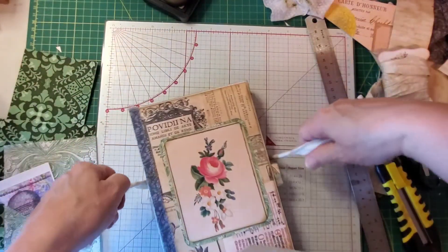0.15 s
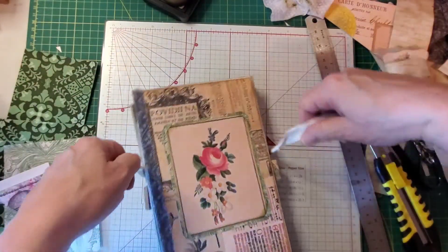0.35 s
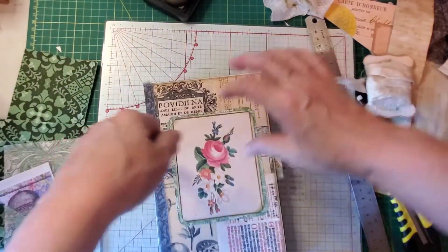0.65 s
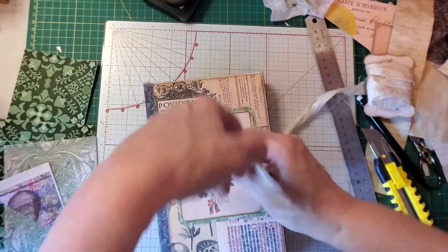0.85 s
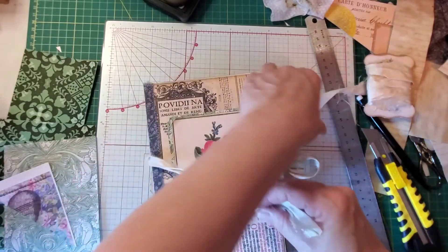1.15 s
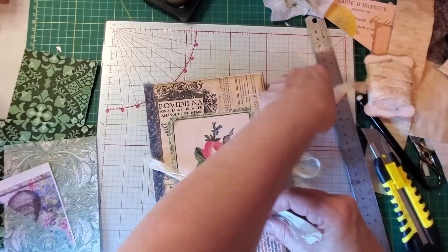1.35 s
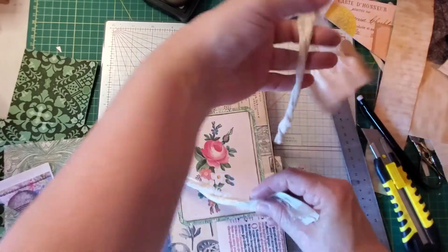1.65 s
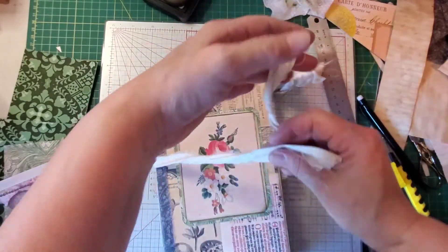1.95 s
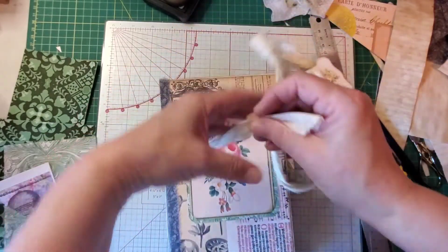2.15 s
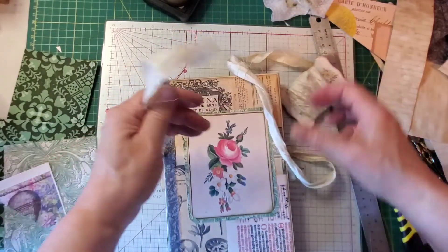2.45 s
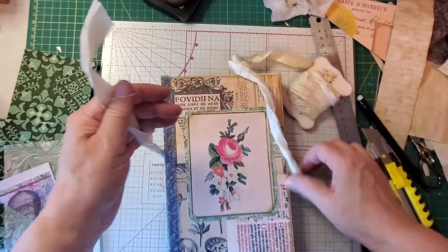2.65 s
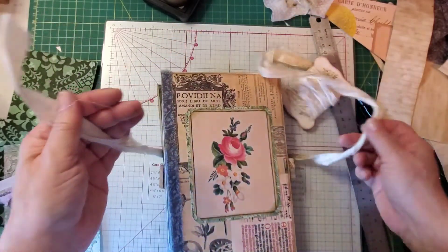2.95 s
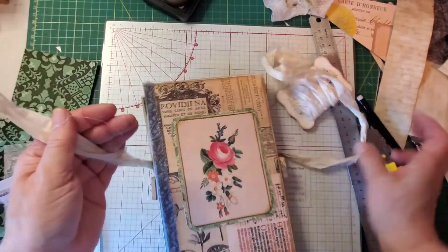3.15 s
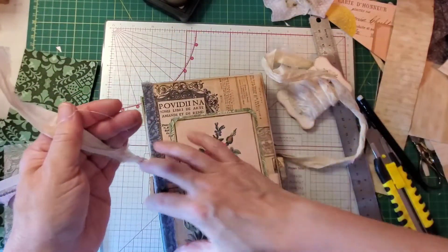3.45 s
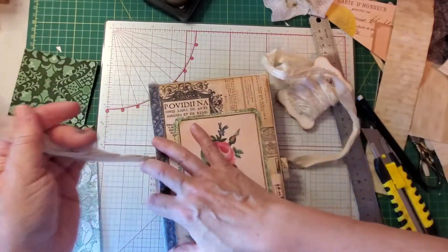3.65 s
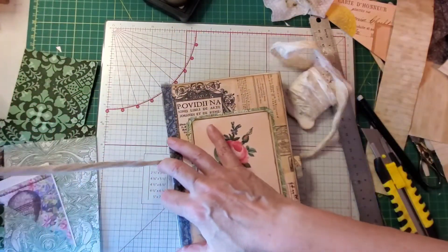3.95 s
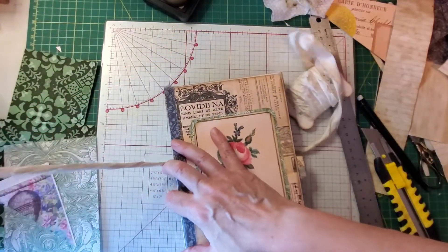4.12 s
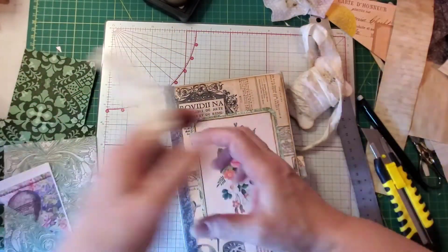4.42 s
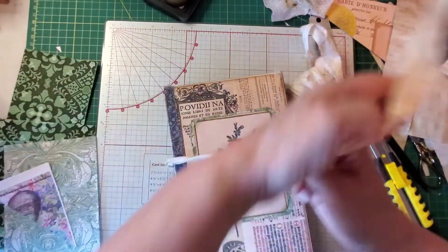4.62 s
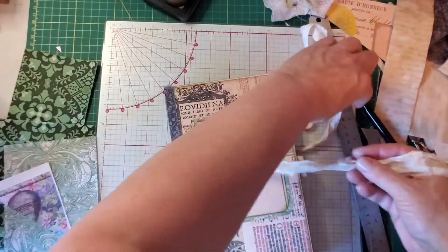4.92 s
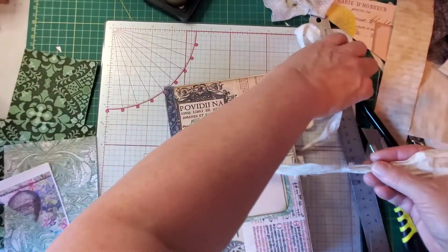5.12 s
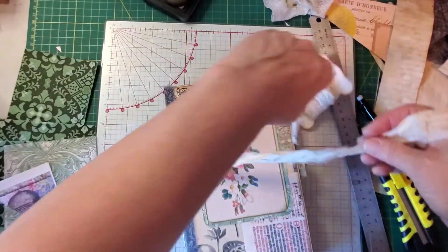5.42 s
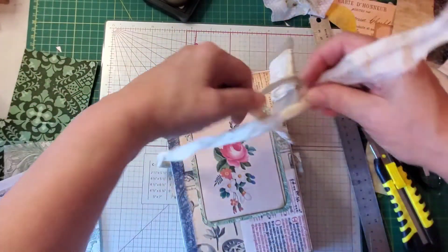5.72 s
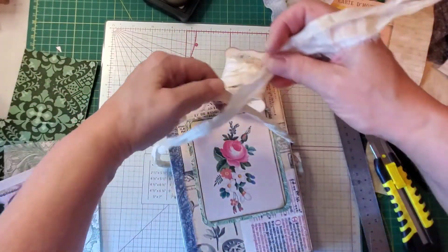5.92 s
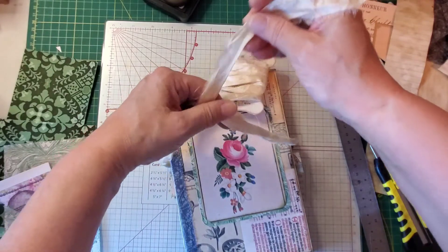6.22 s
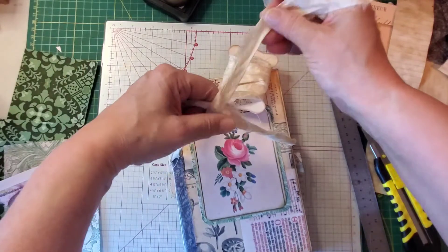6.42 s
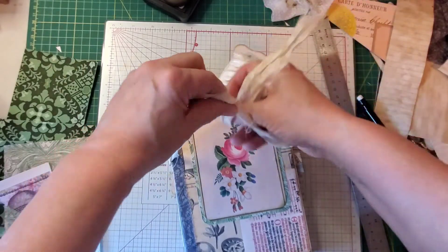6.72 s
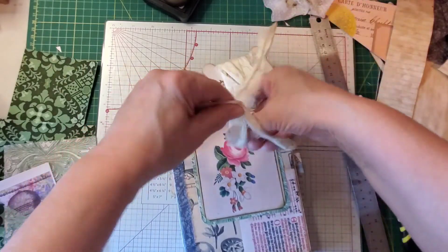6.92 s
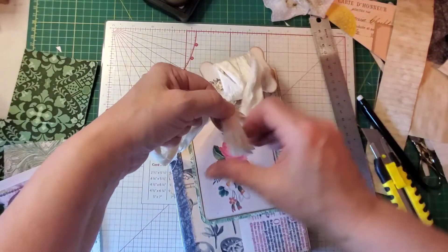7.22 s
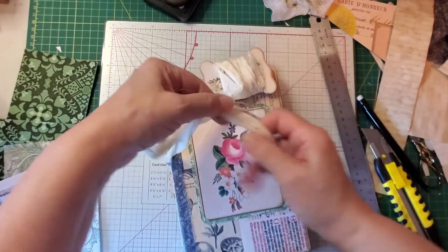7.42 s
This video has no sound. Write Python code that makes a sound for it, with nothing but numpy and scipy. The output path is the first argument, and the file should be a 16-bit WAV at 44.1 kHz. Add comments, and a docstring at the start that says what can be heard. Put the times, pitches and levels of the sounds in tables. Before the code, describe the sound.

Close up in a small, quiet room, silk ribbon is wound around a paper journal in soft, intermittent swishes. After an opening bump and some light knocks, a card spool gives a cluster of sharp scrapes on the mat, the loudest sound. A jerky rasp follows as the ribbon is dragged under the book, then a second, shorter cluster of scrapes and bumps, and more gentle fabric rustling.

```python
"""Soft swishes, knocks and a few sharp scrapes: a silk ribbon is wound round a paper journal
on a craft table in a small room. The book skids; hands and book knock on the table.
The ribbon slides through the fingers, snags on the paper and is dragged from under the book.
Its card spool, tugged along, scrapes over the cutting mat and jars a steel ruler."""
import sys
import numpy as np
from scipy import signal
from scipy.fft import rfft, irfft, next_fast_len
from scipy.io import wavfile
from scipy.ndimage import uniform_filter1d

SR = 44100
rng = np.random.default_rng(int(sys.argv[2]) if len(sys.argv) > 2 else 0)


def to_wav(s):
    """Save 16-bit WAV."""
    ch = np.atleast_2d(s).T  # columns
    pcm = np.round(np.clip(ch, -1, 1) * 32767)  # PCM
    wavfile.write(sys.argv[1], SR, pcm.astype(np.int16))


N = 333837
T = np.arange(N) / SR
HZ = np.fft.rfftfreq(2 * next_fast_len(N // 2 + SR // 2), 1 / SR)


def amp(db):
    """dB to gain."""
    return 10 ** (np.asarray(db) / 20)


def unit(x):
    """Scale to rms 1."""
    return x / np.sqrt(np.mean(abs(x) ** 2) + 1e-30)


def read(points, hz):
    """Interpolate (f/Hz, value) points over log frequency."""
    f, value = np.transpose(points)
    return np.interp(np.log(hz + 1), np.log(f + 1), value)


def spectrum(x):
    """Zero-padded spectrum on the HZ grid."""
    return rfft(x, 2 * len(HZ) - 2)


def colour(x, gain):
    """Minimum-phase filter of the given shape; keeps the power of white noise."""
    cepstrum = irfft(np.log(np.maximum(unit(gain), 1e-5)))[:len(HZ)]
    cepstrum[0] /= 2
    return irfft(spectrum(x) * np.exp(spectrum(2 * cepstrum)))[..., :N]


def resonances(modes):
    """Summed power response of modes."""
    return sum(amp(db) ** 2 / (1 + ((HZ ** 2 - hz ** 2) / (width_hz * (HZ + 1))) ** 2)
               for hz, width_hz, db in modes)


def add(mix, start_s, sound):
    """Mix in a two-channel sound."""
    part = mix[:, round(start_s * SR):][:, :sound.shape[1]]
    part += sound[:, :part.shape[1]]


def stroke(t, rise_s, fade_s):
    """Contact force: smooth rise, exponential release."""
    return np.sin(np.pi / 2 * np.minimum(t / rise_s, 1)) ** 2 * np.exp(-np.maximum(t - rise_s, 0) / fade_s)


def friction(per_s, spread_db, hiss, size=N):
    """Tiny slips of uneven strength over smooth hiss; two channels, rms 1."""
    slipping = rng.random(size) < per_s / SR
    strength = slipping * amp(spread_db * np.minimum(rng.exponential(1, size), 4))
    slips = unit(strength * rng.choice([-1, 1], (2, size)))
    return unit(slips + hiss * rng.standard_normal((2, size)))


def uneven(db, per_s):
    """Randomly wandering gain."""
    heights = rng.standard_normal(1000)
    return amp(db * np.interp(T * per_s, np.arange(len(heights)), heights))


def stereo(mid, side):
    """Mid/side to left/right: partly alike in bass and mids, apart in the treble."""
    # left-right likeness: f/Hz, correlation
    likeness = [(60, 0.2), (150, 0.45), (640, .8), (1400, 0.11), (3000, 0.0043), (7000, -0.17),
                (15000, 0.065)]
    alike = read(likeness, HZ)
    common = spectrum(mid) * np.sqrt((1 + alike) / 2)
    apart = spectrum(side) * np.sqrt((1 - alike) / 2)
    return irfft(np.array([common + apart, common - apart]))[:, :N]


def air():
    """Steady room rumble and faint hiss."""
    # background spectrum: f/Hz, level/dB
    shape = [(20, -32), (45, -13), (75, 0), (105, -13), (150, -13), (240, -25), (310, -21), (500, -29),
             (1000, -39.5), (3000, -44), (7300, -50), (8200, -46), (16000, -46)]
    return amp(-61) * stereo(*colour(rng.standard_normal((2, N)), amp(read(shape, HZ))))


def book():
    """One shove: the back cover skids over the mat."""
    # sliding cover spectrum: f/Hz, level/dB
    board = [(88, -25.5), (150, 3.5), (222, -13), (328, -11), (475, -18), (790, -13), (1260, -22),
             (1720, -7.5), (2270, -15), (3770, -9.5), (5570, -26), (6020, -20.5), (16000, -26.5)]
    skid = stroke(T, rise_s=0.009, fade_s=0.032) * friction(per_s=1500, spread_db=2, hiss=1)
    return amp(-30) * colour(skid, amp(read(board, HZ)))


def knocks():
    """Padded blows of book and fingers: a damped swing, a dull puff and a short click."""
    # blows: t/s, level/dB, f/Hz, click level/dB
    blows = [(0.002, -31, 61.2, -63), (0.003, -37, 178, -80), (0.455, -52.5, 530, -48),
             (0.46, -46.5, 74, -82), (0.612, -47, 301, -58), (1.219, -36.5, 156, -52),
             (1.236, -40.5, 72, -82), (1.572, -41, 436, -43.5), (1.606, -40, 503, -34.5),
             (2.68, -61.5, 1100, -68), (3.029, -52.5, 389, -71.5), (5.05, -45, 85, -76),
             (5.141, -39.5, 154, -80), (5.19, -37, 158, -81.5), (5.245, -44.5, 74.4, -81),
             (6.619, -58, 559, -80), (6.966, -57, 618, -78), (7.034, -53, 620, -77)]
    # click spectrum: f/Hz, level/dB
    click_shape = [(150, -2.5), (1200, -3.5), (4500, -6), (7500, -19.5), (16000, -16)]
    fade_cycles = 3.2
    dull, click = np.zeros((2, 2, N))
    t = T[:SR // 3]
    for start_s, db, hz, click_db in blows:
        band = signal.butter(3, [hz / 1.5, hz * 1.5], "bandpass", fs=SR, output="sos")
        puff, crack = rng.standard_normal((2, 2, len(t)))
        swing = np.sqrt(2) * np.sin(2 * np.pi * hz * t) * np.array([[1], [0]])  # mid channel only
        pure = 1 / (1 + (hz / 220) ** 2)  # deep blows move the table in one piece
        body = np.sqrt(pure) * swing + np.sqrt(1 - pure) * unit(signal.sosfilt(band, puff))
        add(dull, start_s, amp(db) * stroke(t, rise_s=0.003, fade_s=fade_cycles / hz) * body)
        add(click, start_s, amp(click_db) * stroke(t, rise_s=0.0028, fade_s=0.0062) * crack)
    return dull + colour(click, amp(read(click_shape, HZ)))


def ribbon():
    """Silk slides over skin: a fine fizz, plus a fuller rustle under a tight grip."""
    # passes through the fingers: t/s, level/dB, rise/s, fade/s, grip (rustle gain)/dB
    swishes = [(.1, -63, 0.067, 0.21, -2.5), (0.349, -65, 0.21, .13, 2.5), (.7, -78, 0.035, 0.16, -16),
               (1.439, -51.5, 0.078, 0.032, 4), (1.595, -61, .012, 0.068, -8),
               (2.22, -71.5, .08, 0.13, -14), (2.6, -70.5, 0.069, 0.22, -12),
               (2.82, -67.5, 0.18, 0.056, -12), (3.309, -63, 0.11, 0.12, -7.5),
               (4.25, -70.5, 0.063, 0.036, -15), (4.52, -68.5, .07, 0.082, -11), (4.661, -72, 0.17, .07, 1),
               (4.94, -72, .07, .03, -5.5), (5.269, -65, .25, 0.24, -2.5), (5.58, -66, 0.15, .045, -3.5),
               (5.89, -73.5, 0.038, 0.086, -6), (6.27, -66, 0.082, 0.022, 1), (6.43, -62, .12, 0.048, -6),
               (6.629, -64, .15, 0.14, -7.5), (6.9, -71, .14, .04, -9), (7.27, -74, 0.064, .04, -11),
               (7.39, -54.5, 0.14, 0.26, -7)]
    # silk friction spectrum: f/Hz, level/dB
    silk = [(300, -12), (900, -10), (1700, -7), (2500, 0), (4200, 0), (5500, -2), (7200, -6), (8200, 1),
            (11000, 1), (16000, -2)]
    fizz, rustle = np.zeros((2, N))
    for start_s, db, rise_s, fade_s, grip_db in swishes:
        speed = amp(db) * stroke(np.maximum(T - start_s, 0), rise_s, fade_s)
        fizz += speed
        rustle += amp(grip_db) * speed
    shape = amp(read(silk, HZ))
    treble = 1 / (1 + (7000 / (HZ + 1)) ** 8)
    creases = uneven(db=1.57, per_s=67)
    fine = fizz * creases * friction(per_s=920, spread_db=5, hiss=1.5)
    full = rustle * creases * friction(per_s=970, spread_db=1.5, hiss=1.5)
    return (amp(1.5) * colour(fine, shape * np.sqrt(treble))
            + amp(-1.5) * colour(full, shape * np.sqrt(1 - treble)))


def snags():
    """Threads catch on the paper and let go with a tiny crackle."""
    # thread releases: t/s, level/dB
    releases = [(0.135, -42), (0.184, -37), (0.223, -40), (0.372, -48), (1.537, -32.5), (2.504, -53),
                (2.784, -51), (2.881, -51.5), (2.934, -47.5), (3.353, -50), (3.396, -44.5), (3.417, -43),
                (3.474, -41.5), (3.507, -47)]
    # crackle spectrum: f/Hz, level/dB
    shape = [(500, 3.5), (2000, -6), (7000, -8), (9000, -1.5), (16000, 3)]
    crackle = np.zeros((2, N))
    burst = stroke(T[:SR // 20], rise_s=0.00059, fade_s=0.0024)
    for start_s, db in releases:
        add(crackle, start_s, amp(db - 0.5) * burst * rng.standard_normal((2, len(burst))))
    return colour(crackle, amp(read(shape, HZ)))


def contact(hz, scrape_db):
    """Gain over frequency: stronger scrapes are brighter; each contact point favours other bands."""
    tilt_db_per_octave = 0.1349 * (scrape_db + 30.5)
    grid_hz = np.arange(0, SR / 2, 200)
    ripple_db = 1.66 * np.interp(hz, grid_hz, rng.standard_normal(len(grid_hz)))
    return amp(tilt_db_per_octave * np.log2(np.maximum(hz, 900) / 3000) + ripple_db)


def spool():
    """Each tumble scrapes a card edge over the mat, jars the ruler and pushes on the table."""
    # scrapes: t/s, level/dB, fade/s
    scrapes = [(1.214, -41, 0.04), (1.241, -38, 0.035), (1.294, -44.5, 0.035), (1.351, -44, .01),
               (1.715, -23, .032), (1.729, -17, 0.02), (1.743, -20.5, 0.02), (1.793, -17.5, 0.017),
               (1.84, -34.5, 0.051), (1.879, -28.5, 0.0079), (1.965, -44, 0.048), (1.997, -39.5, 0.037),
               (2.06, -43, 0.026), (2.15, -50.5, 0.017), (2.174, -44.5, 0.028), (2.199, -40, .018),
               (5.033, -24.5, 0.018), (5.055, -24, 0.01), (5.071, -26.5, 0.015), (5.135, -30, 0.022),
               (5.179, -29.5, 0.025), (5.237, -33.5, 0.01)]
    # card-on-mat friction spectrum: f/Hz, level/dB
    rub_shape = [(100, -23), (400, -6.5), (800, 0.5), (1300, -20), (1800, -8.5), (2400, -7.5), (4000, -3.5),
                 (4600, -17.5), (6200, -1.5), (7200, -17.5), (8600, -9.5), (11000, -5.5), (16000, -22.5)]
    # modes of card spool, steel ruler and table top: f/Hz, width/Hz, level/dB
    card_modes = [(423, 41, -6), (998, 24, 4), (1170, 40, -5), (1325, 30, -3), (1390, 60, -0.5),
                  (1720, 96, 3), (1820, 94, 2.5), (1952, 40, 5.5), (2150, 32, 4), (2610, 150, 10),
                  (2920, 60, 7), (3181, 19, -3.5), (3587, 290, 10.5), (4140, 29, 0), (4930, 37, -2),
                  (5080, 14, -2), (6900, 57, -12), (7550, 48, -8), (8044, 370, -3), (9090, 22, -1),
                  (9173, 76, -5), (9500, 55, -1), (11700, 45, -5), (12900, 35, -15.5), (13645, 63, -10),
                  (13970, 42, -7.5), (14646, 168, -16), (15410, 88, -14)]
    ruler_modes = [(1015, 40, 2), (2000, 130, -5), (2530, 45, -6.5), (2584, 50, 1.5), (2652, 45, -6.5),
                   (3400, 45, -4), (3540, 41, -3), (3780, 50, -0.5), (3650, 45, -6)]
    table_modes = [(59.1, 8.3, 0.5), (74, 5.4, -1.5), (130, 22, -4), (162, 22, -0.5), (308, 19, -4)]
    size = SR // 3
    hz = np.fft.rfftfreq(size, 1 / SR)
    rub, jar, push = np.zeros((3, 2, N))
    for start_s, db, fade_s in scrapes:
        force = stroke(T[:size], rise_s=0.0062, fade_s=fade_s)
        tilt = contact(hz, db)
        slips = friction(per_s=2200, spread_db=2, hiss=0.8, size=size)
        jar_db = db + 0.25 * min(db + 13.5, 0)  # hard blows ring more
        push_db = -32 + 0.48 * db
        add(rub, start_s, amp(db) * force * irfft(rfft(slips) * tilt, size))
        add(jar, start_s, amp(jar_db) * force * rng.standard_normal((2, size)))
        add(push, start_s, amp(push_db) * force * rng.standard_normal((2, size)))
    card = colour(rub, np.sqrt(amp(read(rub_shape, HZ)) ** 2 + resonances(card_modes)))
    steel = colour(jar, np.sqrt(resonances(ruler_modes) / (1 + (HZ / 5000) ** 4)))
    bass_band = 1 / (1 + (HZ / 500) ** 4) / (1 + (42 / (HZ + 1)) ** 6)
    boom = colour(push, np.sqrt(resonances(table_modes) * bass_band))
    return card + amp(-8) * steel + boom


def drag():
    """The weave rasps between mat and pressed book in small jerks; the cover sounds with it."""
    # pull envelope: t/s, level/dB
    pull_curve = [(3.46, -79), (3.484, -62), (3.494, -59), (3.518, -41.5), (3.554, -50.5), (3.656, -41),
                  (3.68, -48), (3.83, -46), (4.028, -55.5), (4.088, -51.5), (4.17, -53), (4.22, -75)]
    # spectra of ribbon weave and book cover: f/Hz, level/dB
    weave = [(1200, -15), (1900, -7), (2800, -2), (3450, 4.5), (4400, -3), (5300, -1), (7000, -6.5),
             (9300, 2), (12000, 0.5), (16000, -1.5)]
    cover = [(80, -6), (160, -7.5), (260, -15.5), (400, -1), (550, -5), (710, 1.5), (1050, -4.5), (1280, 1),
             (1600, -3), (2100, -9.5), (3500, -20)]
    pull_db = np.interp(T, *np.transpose(pull_curve), left=-150, right=-150)
    pull = uniform_filter1d(amp(pull_db), size=200) * uneven(db=2.5, per_s=25)
    hiss = colour(pull * friction(per_s=1800, spread_db=4, hiss=1.17), amp(read(weave, HZ)))
    rasp = colour(pull * friction(per_s=600, spread_db=3, hiss=0.56), amp(read(cover, HZ)))
    return amp(2) * hiss + amp(-2) * rasp


def room(x, early_db, tail_db):
    """Direct sound, quick reflections off the table clutter and a short small-room tail."""
    # reverberation time: f/Hz, t60/s
    t60 = [(100, 0.22), (500, 0.3), (3000, 0.18), (8000, 0.14), (16000, 0.12)]
    t = T[:SR // 2]
    taps = rng.choice([-1., 1.], (2, len(t))) * (rng.random((2, len(t))) < 5000 / SR)
    early = taps * np.exp(-t / 0.003) * (t > 0.0008)
    early = signal.lfilter(*signal.butter(1, 1200, "highpass", fs=SR), early)  # clutter reflects no bass
    hz, frame_s, frames = signal.stft(taps * (t > 0.008), SR, nperseg=256)
    decay = amp(-60 * frame_s / read(t60, hz)[:, None])
    tail = signal.istft(frames * decay, SR, nperseg=256)[1][:, :len(t)]
    echoes = (amp(early_db) * unit(early) + amp(tail_db) * unit(tail)) / np.sqrt(len(t))
    wet = signal.fftconvolve(x, echoes, axes=1)[:, :N]
    return (x + wet) / np.sqrt(1 + amp(early_db) ** 2 + amp(tail_db) ** 2)


def scene():
    """Spool, book, ribbon and hands, a little left of centre, over the room's air."""
    # left minus right: f/Hz, level/dB
    left_bias = [(100, -1.5), (400, 3), (1000, 3.5), (2200, 3.5), (4000, 4), (8000, 6), (15000, 0)]
    hard = room(spool() + book(), early_db=-6, tail_db=-4)
    soft = room(ribbon() + drag() + snags() + knocks(), early_db=-5, tail_db=-7.5)
    pair = stereo(*(hard + soft))
    balance = amp(np.array([[0.5], [-0.5]]) * read(left_bias, HZ))
    return irfft(spectrum(pair) * balance)[:, :N] + air()


def record(dry):
    """Steep low-pass on the top treble."""
    edge_hz = 15950
    lowpass = signal.firwin(511, edge_hz, window=("kaiser", 9), fs=SR)
    return signal.oaconvolve(dry, lowpass[None], "same")


dry = scene()
out = record(dry)
to_wav(out)
```